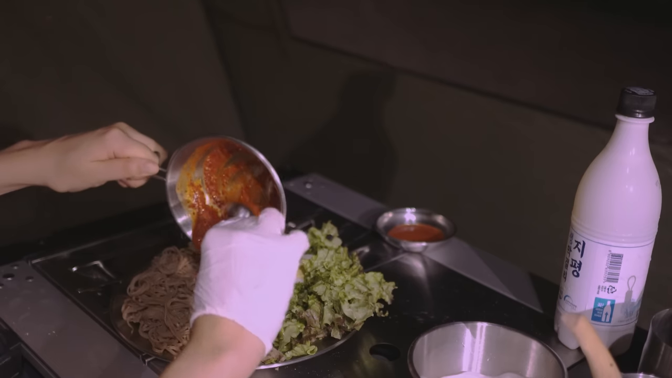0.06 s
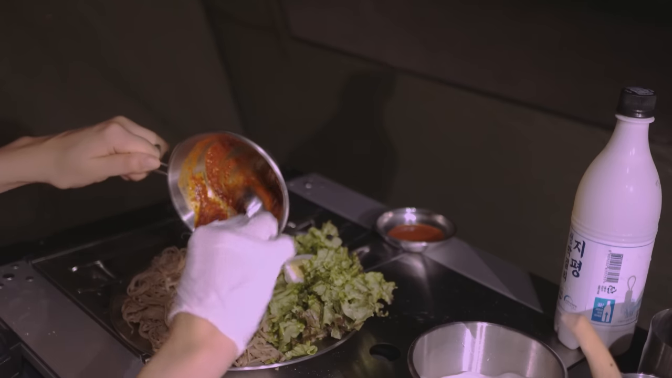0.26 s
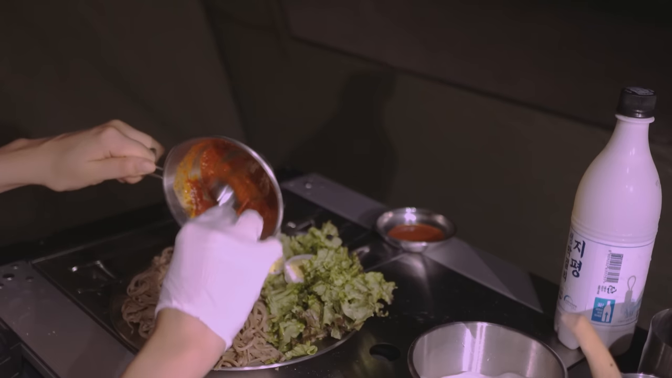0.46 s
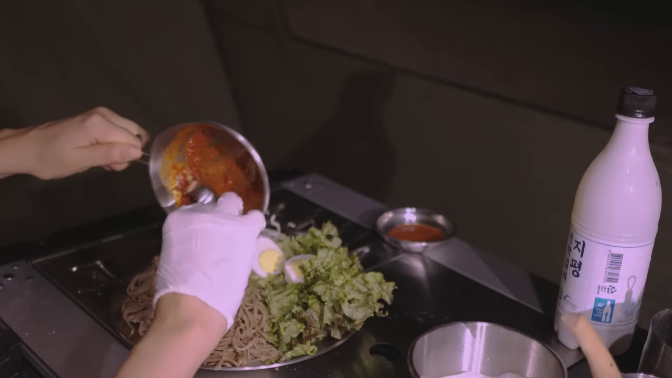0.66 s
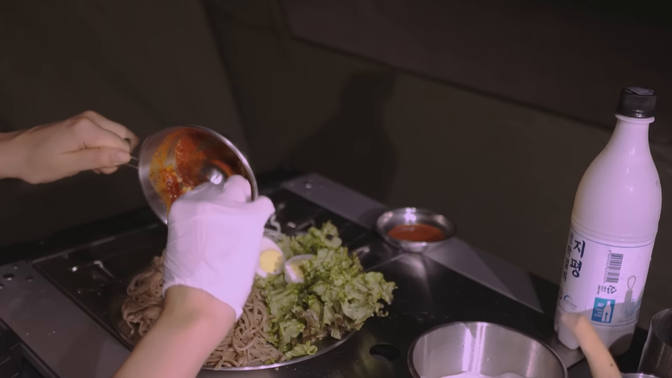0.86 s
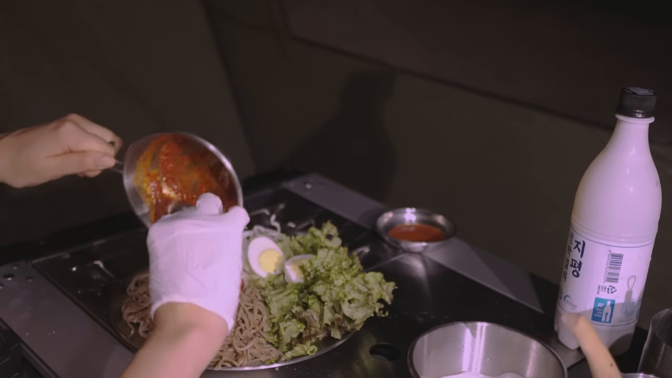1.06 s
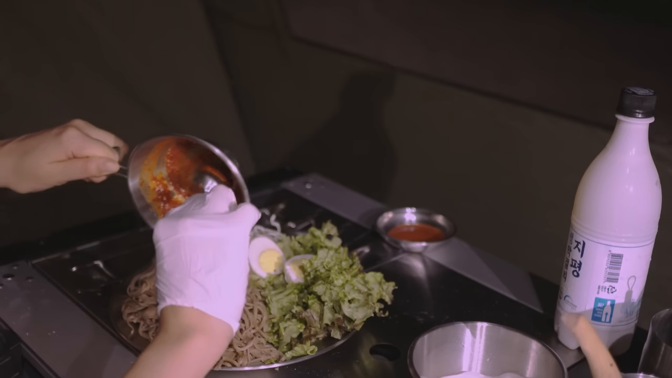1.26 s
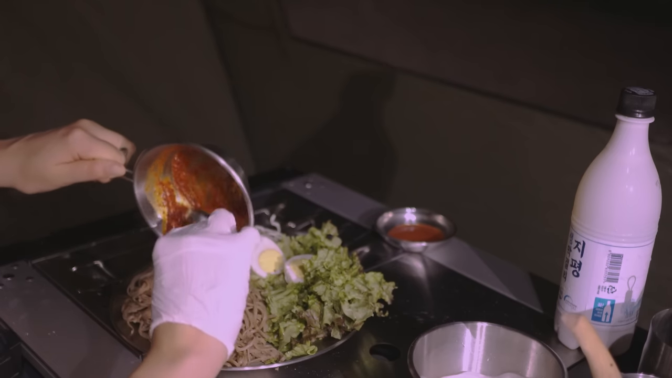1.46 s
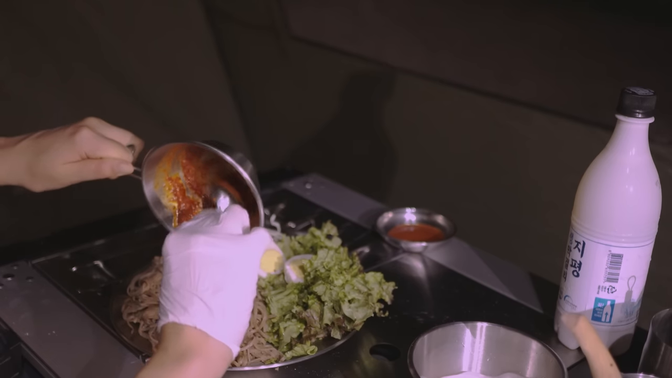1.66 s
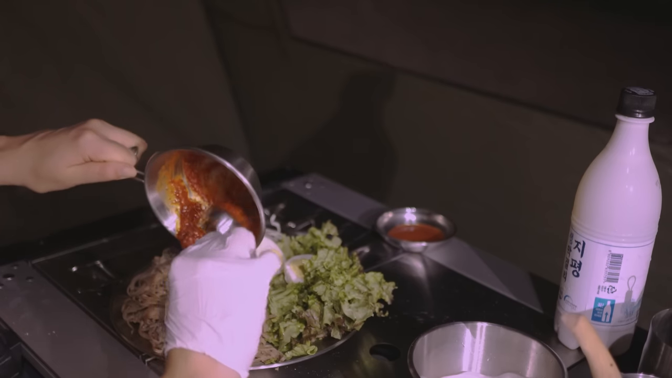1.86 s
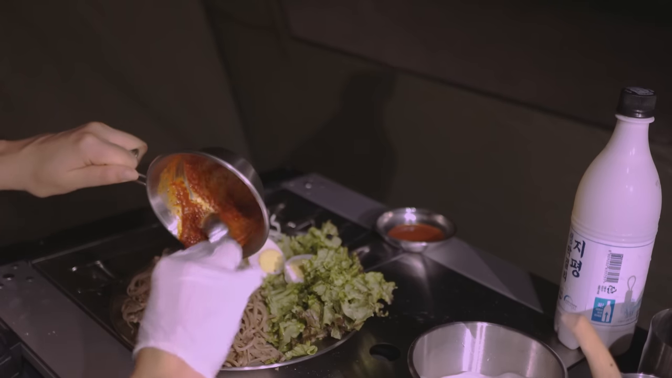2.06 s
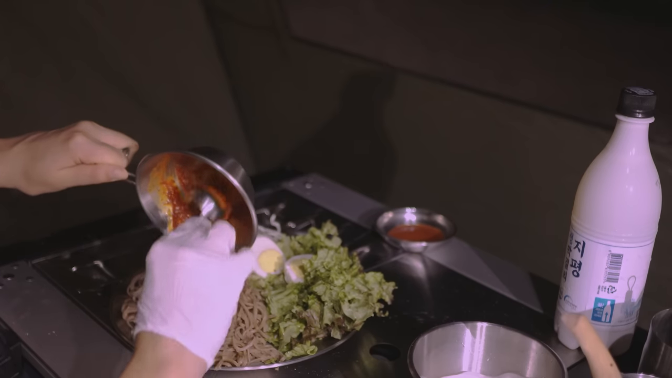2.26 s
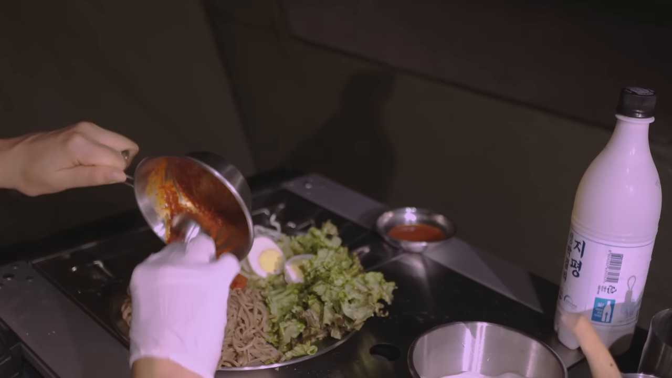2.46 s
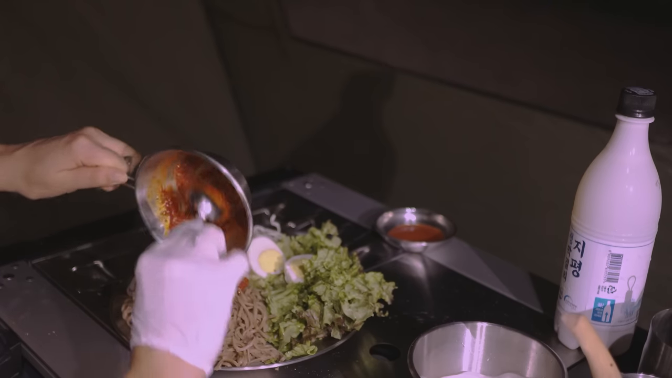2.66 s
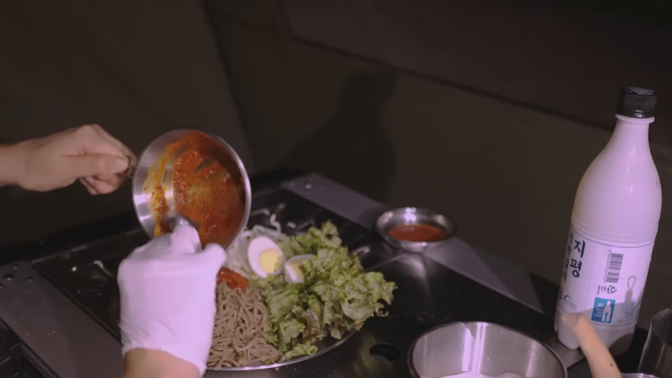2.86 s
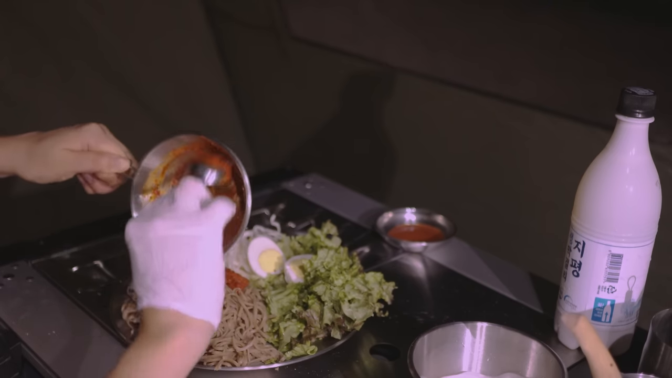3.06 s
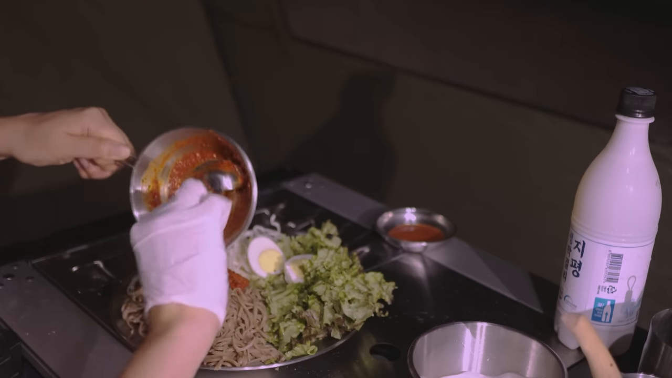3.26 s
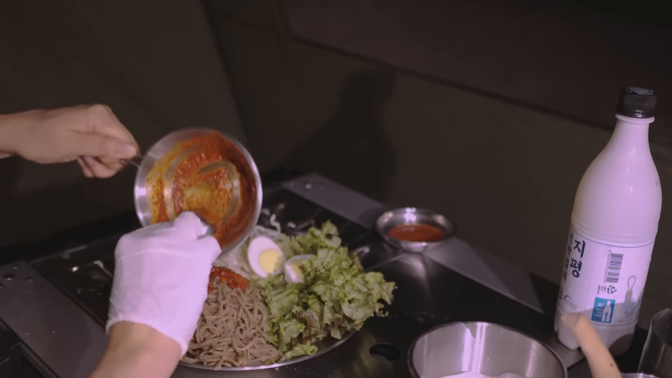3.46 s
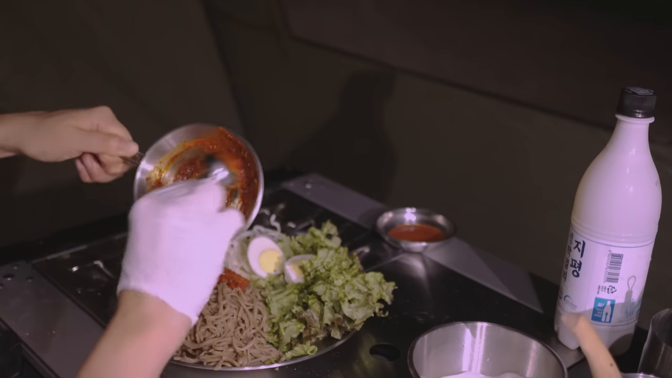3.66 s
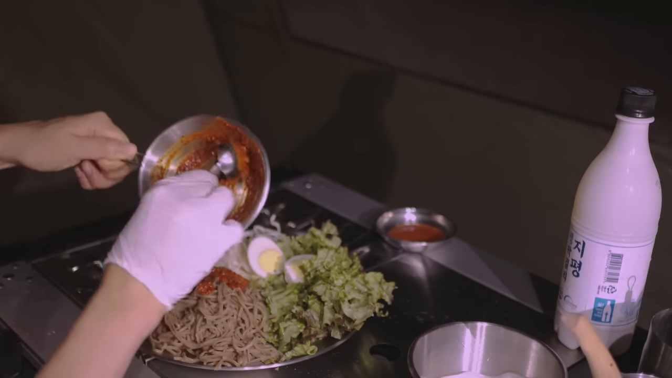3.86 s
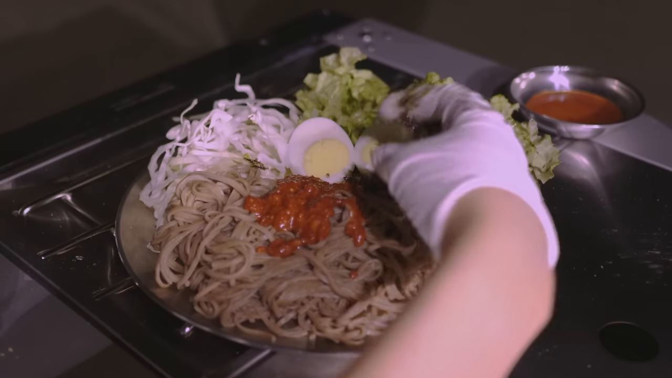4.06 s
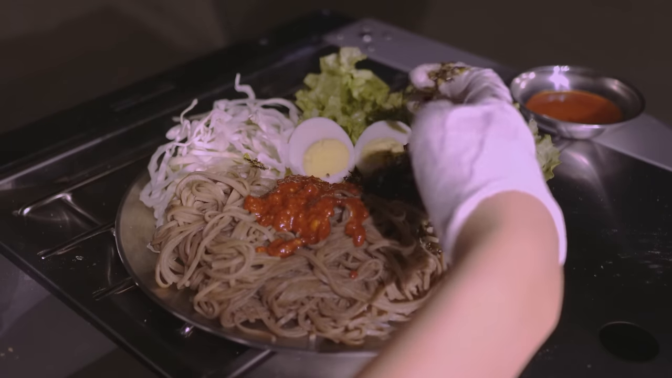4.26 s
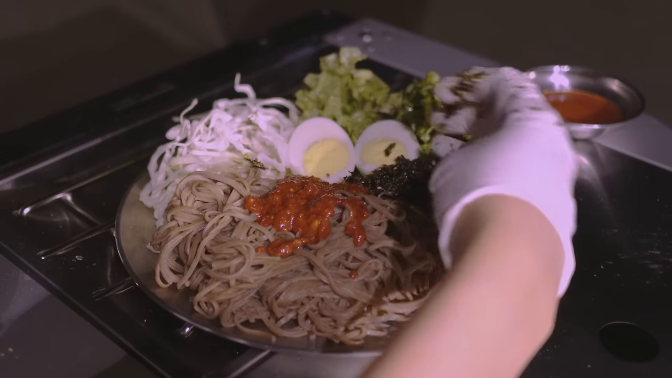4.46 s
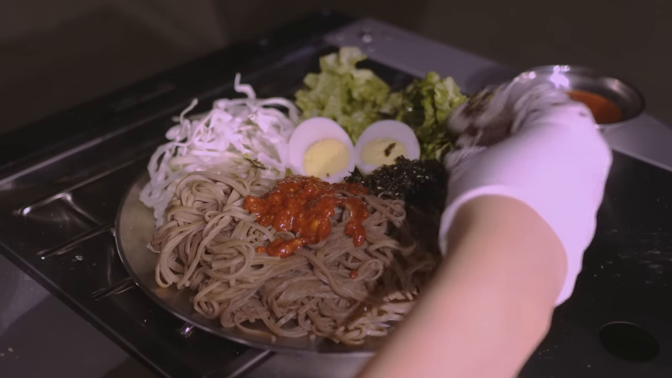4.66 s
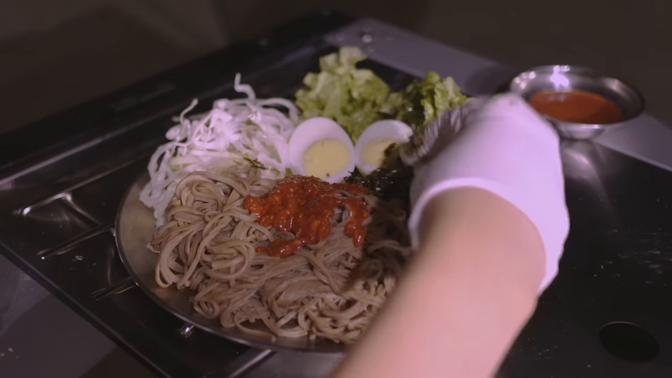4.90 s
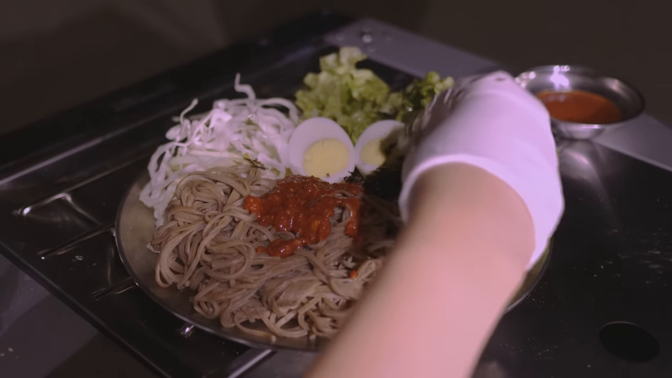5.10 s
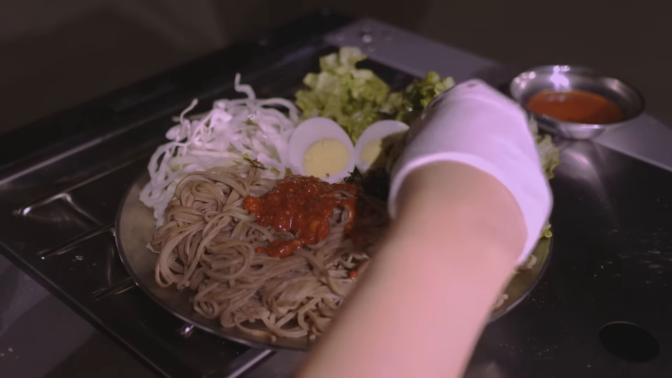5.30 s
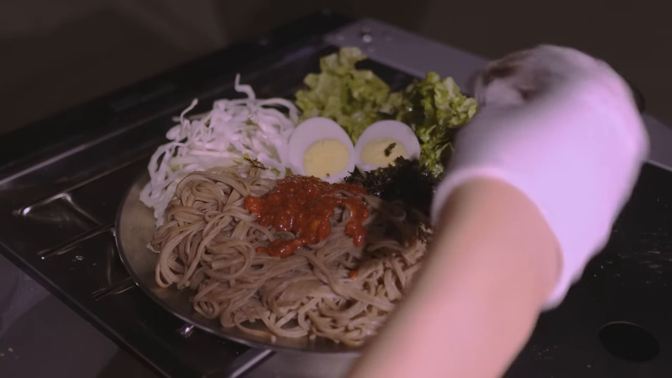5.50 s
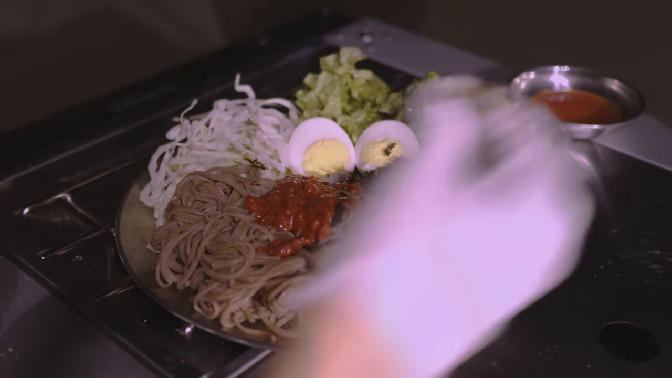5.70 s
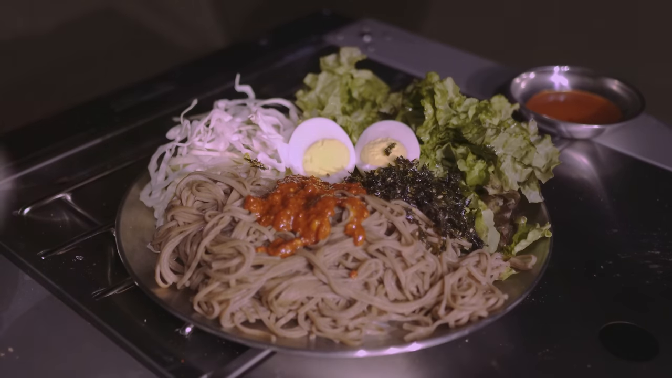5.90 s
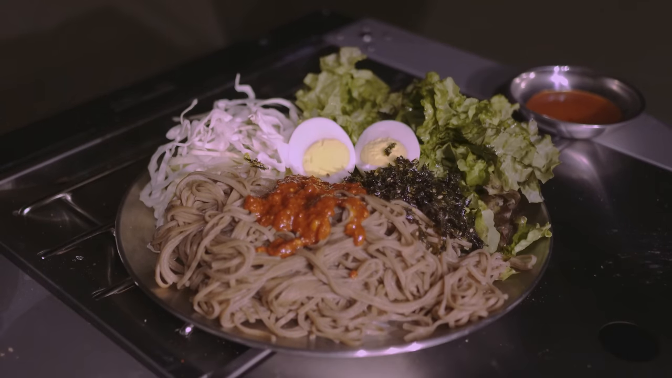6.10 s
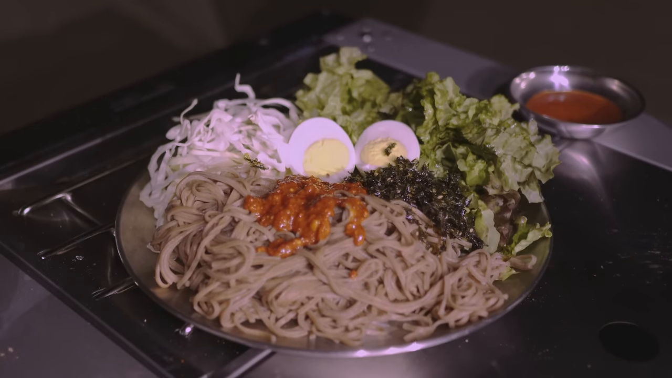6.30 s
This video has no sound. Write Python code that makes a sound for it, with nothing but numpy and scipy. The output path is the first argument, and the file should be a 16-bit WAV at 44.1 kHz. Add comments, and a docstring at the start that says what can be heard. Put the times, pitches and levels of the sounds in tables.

```python
"""A spoon knocks, scrapes and squeaks in a small steel bowl, close by, outdoors at night.
Its blows and rough slips set off the ringing of the steel; all sound of the bowl is cut off abruptly at 3.954 s.
Then dry seaweed is crumbled, heard as faint random snaps, and something slides and knocks on the tray.
All around, several kinds of cricket trill in sagging pulses, and a nearer one chirps in falling whistles.
Coloured noise adds the night air: a low rumble and a soft wash."""
import sys
import numpy as np
from scipy import signal
from scipy.fft import rfft, irfft
from scipy.io import wavfile
from scipy.ndimage import uniform_filter1d

SR = 44100
rng = np.random.default_rng(int(sys.argv[2]) if len(sys.argv) > 2 else 0)


def wav_out(sig):
    """Save sig, one row per channel (or a flat mono array), as 16-bit PCM at SR to the path in sys.argv[1]."""
    wavfile.write(sys.argv[1], SR, np.round(np.clip(np.atleast_2d(sig).T, -1, 1) * 32767).astype(np.int16))


N = 279594
TIME = np.arange(N) / SR


def amp(db):
    """Turns decibels into a gain."""
    return 10 ** (np.asarray(db) / 20)


def unit(x):
    """Scales a sound to an average (rms) level of 1."""
    return x / np.sqrt(np.mean(x ** 2) + 1e-20)


def read(points, hz):
    """Reads a curve between its points, along a log-frequency axis."""
    point_hz, value = np.transpose(points)
    return np.interp(np.log(hz + 1), np.log(point_hz), value)


def add(mix, s, sound):
    """Mixes a sound in at time s."""
    part = mix[max(round(s * SR), 0):][:len(sound)]
    part += sound[:len(part)]


def ring(x, response):
    """Lets a sound set off a response, as a struck or rubbed body rings."""
    return signal.fftconvolve(x, response)[:N]


def colour(points, size=2048):
    """Makes a response of energy 1 with the given spectrum, which never sounds ahead of its cause."""
    log_gain = np.log(amp(read(points, abs(np.fft.fftfreq(size, 1 / SR)))))
    spectrum = np.exp(np.conj(signal.hilbert(log_gain)))
    response = np.fft.ifft(spectrum).real[:size // 2]
    return response / np.linalg.norm(response)


def drift(per_s):
    """Random wavering of rms 1; a higher rate wavers faster."""
    knots = rng.standard_normal(4096)
    return unit(np.interp(TIME * 2 * per_s, np.arange(len(knots)), knots))


def tail(t60, size=16384):
    """Dense dying noise of energy 1 that falls by 60 dB in t60 seconds."""
    response = rng.standard_normal(size) * amp(-60 * np.arange(size) / SR / t60)
    return response / np.linalg.norm(response)


def grains(per_s, spread_db):
    """Tiny slips or snaps of uneven size at random moments, rms 1."""
    size = amp(spread_db * np.minimum(rng.exponential(1, N), 2))
    happens = rng.random(N) < per_s / SR
    return unit(size * rng.choice([-1, 1], N) * happens)


def contact(seconds, chatter, size=400):
    """One sharp contact with a brief dying chatter after it, energy 1."""
    burst = rng.choice([-1., 1.], size) * np.exp(-np.arange(size) / SR / seconds)
    burst *= chatter / np.linalg.norm(burst)
    burst[0] = 1
    return burst / np.linalg.norm(burst)


def bouts(rows, rise_s, fall_s):
    """Gain over time: each row (start_s, end_s, level_db) fades in, holds and fades out."""
    gain = 0
    for start, end, db in rows:
        fade = np.minimum((TIME - start) / rise_s, (end - TIME) / fall_s)
        gain = gain + amp(db) * np.clip(fade, 0, 1)
    return gain


def push(start, fastest, end, db, swell_db=12.5, release_db=11.5):
    """Gain along one stroke of the hand, which speeds up and then slows."""
    t = start + np.arange(max(round((end - start) * SR), 2)) / SR
    return amp(db + np.interp(t, [start, fastest, end], [-swell_db, 0, -release_db]))


# spectrum of the night air: pitch_hz, level_db
AIR_COLOUR = [(20, 5.5), (45, -4), (80, -10.5), (200, -13), (500, -13), (1000, -14.5), (2000, -16),
              (3200, -13.5), (5000, -18), (6000, -24), (9000, -26.5), (15000, -23)]
# how alike the air is at left and right: pitch_hz, likeness (1 = the same)
AIR_LIKENESS = [(30, 0.31), (80, 0.75), (300, 0.29), (1100, 0.65), (2000, 0.57), (16000, .2)]


def night_air(level_db=-50.5):
    """Coloured noise gives a low rumble and a soft wash of far insects, partly alike on both sides."""
    hz = np.fft.rfftfreq(N, 1 / SR)
    left, other = rfft(rng.standard_normal((2, N))) * amp(read(AIR_COLOUR, hz))
    same = np.clip(read(AIR_LIKENESS, hz), -1, 1)
    right = same * left + np.sqrt(1 - same ** 2) * other
    return amp(level_db) * unit(irfft(np.array([left, right]), N))


def outdoors(x, scattered, balance_db, t60, late_ms):
    """A call reaches the left later; ground and foliage scatter it differently to each side."""
    share = np.clip(scattered, 0, 1)
    direct = np.array([np.roll(x, round(late_ms * SR / 1000)), x])
    echoes = np.array([ring(x, tail(t60)) for side in range(2)])
    both = np.sqrt(1 - share) * unit(direct) + np.sqrt(share) * unit(echoes)
    return unit(both) * amp([[balance_db / 2], [-balance_db / 2]])


def trill(hz, per_s, fall_hz):
    """Each wing stroke sounds one pulse that sags in pitch as the wing slows."""
    rate = per_s * (1 + .015 * drift(per_s=3))
    cycle = (np.cumsum(rate) / SR + rng.random()) % 1  # place within the pulse, 0 to 1
    pitch = hz + fall_hz * (.5 - cycle) + 40 * drift(per_s=50)
    tone = np.sin(2 * np.pi * np.cumsum(pitch) / SR)
    return np.sin(np.pi * cycle) ** 2 * tone * amp(2.0 * drift(per_s=12))


# kinds of trilling cricket: pitch_hz, spread_hz of the distant ones, pulses_per_s, fall_hz in each pulse,
# nearest_db, distant_db, balance_db (left over right), late_ms (later on the left);
# for the main kind and those in bouts, the two levels add to the level of the trill or bout
CRICKETS = {"low": (2150, 55, 55.5, 110, -59, -55.5, -3.5, 0.14),
            "faint": (2968, 91.5, 40.5, 112, -65.5, -59.5, 1, 0.4),
            "far": (3690, 70, 45.5, 140, -57, -53, -0.5, 0.04),
            "main": (3870, 60, 27, 300, -5.5, -4.5, -3.5, .023),
            "middle": (4080, 60, 28, 304, -4, -6, -4, 0), "sweep": (4300, 198, 31, 550, -4, -3, 2.5, 0.2),
            "high": (5028, 71, 48, 300, -7, -5.5, -7, .14)}
# kinds that trill in bouts, the high one about once a second: start_s, end_s, level_db
CRICKET_BOUTS = {"high": [(-.15, .52, -51.5), (.7, 1.42, -53.5), (1.88, 2.5, -52), (2.98, 3.58, -50),
                 (3.95, 4.7, -54.5), (4.95, 5.75, -53.5), (5.92, 6.5, -50)], "sweep": [(2.52, 3.0, -57),
                 (2.95, 3.38, -48), (5.5, 6.1, -58)], "middle": [(.1, .65, -54), (2.05, 2.42, -51),
                 (4.45, 4.74, -47.5), (4.86, 5.14, -56), (5.5, 6.1, -55)]}
# the one lull of the main trill: start_s, end_s, dip_db
LULL = (2.2, 3.45, -4.5)


def chorus(main_db=-48, resting_db=-64):
    """Of each kind, the nearest pulses clearly; two distant ones, higher and lower, blur into a shimmer."""
    swell = {}
    for kind, rows in CRICKET_BOUTS.items():
        # a faint trill goes on between bouts
        swell[kind] = amp(resting_db) + bouts(rows, rise_s=.14, fall_s=.15)
    start, end, dip_db = LULL
    swell["main"] = amp(main_db + dip_db * bouts([(start, end, 0)], rise_s=.25, fall_s=0.46))
    out = np.zeros((2, N))
    for kind, row in CRICKETS.items():
        hz, spread_hz, per_s, fall_hz, nearest_db, distant_db, balance_db, late_ms = row
        higher = trill(hz + spread_hz, per_s * 1.13, fall_hz)
        lower = trill(hz - spread_hz, per_s * .88, fall_hz)
        nearest = outdoors(trill(hz, per_s, fall_hz), .3, balance_db, t60=.045, late_ms=late_ms)
        distant = outdoors(higher + lower, .9, balance_db, t60=.2, late_ms=late_ms)
        out += swell.get(kind, 1) * (amp(nearest_db) * nearest + amp(distant_db) * distant)
    return out


# phrases of two pairs of wing strokes: first_pair_s, level_db, leads_in (whether a single stroke comes first)
CHIRPS = [(.172, -40.5, True), (1.564, -42, True), (1.97, -54, False), (3.775, -54, True),
          (3.956, -44.5, False), (4.65, -58, False), (5.463, -45.5, True), (5.875, -45.5, False)]


def near_cricket(top_hz=5420, end_hz=4280, seconds=0.0251):
    """Single wing strokes, mostly in pairs, each a steeply falling whistle."""
    pair_s, rest_s = .045, .074  # between strokes within a pair, and on to the next pair
    pairs = [0, pair_s, pair_s + rest_s, 2 * pair_s + rest_s]
    song = np.zeros(N)
    u = np.linspace(0, 1, round(seconds * SR))
    fade = signal.windows.tukey(len(u), .7)
    for s, db, leads_in in CHIRPS:
        lead = [-rest_s] if leads_in else []
        for offset in lead + pairs:
            pitch = (top_hz + (end_hz - top_hz) * u) * (1 + 0.0066 * rng.standard_normal())
            whistle = np.sin(2 * np.pi * np.cumsum(pitch) / SR)
            add(song, s + offset, amp(db) * np.sqrt(2) * fade * whistle)
    return np.std(song) * outdoors(song, scattered=0.26, balance_db=-5.0, t60=0.14, late_ms=.16)


# slide over the tray: start_s, fastest_s, end_s, top_level_db
TRAY_SLIDE = (6.222, 6.29, 6.37, -35.5)
# knocks on the tray: start_s, level_db
KNOCKS = [(6.284, -8), (6.3198, -5.5)]
# spectrum of the tray: pitch_hz, level_db
TRAY_COLOUR = [(40, -6), (110, 2.5), (220, -5), (400, 0.5), (620, -3), (850, 3.5), (1100, 2), (2200, 0.5),
               (4000, -7.5), (6000, -6), (8000, -11), (10000, -4.5), (12000, -17), (16000, -16)]


def tray():
    """A short rough slide and two knocks set off the tray."""
    drive = np.zeros(N)
    add(drive, TRAY_SLIDE[0], push(*TRAY_SLIDE))
    drive *= grains(per_s=5000, spread_db=3.5)
    for s, db in KNOCKS:
        add(drive, s, amp(db) * contact(seconds=0.002, chatter=2))
    return ring(drive, colour(TRAY_COLOUR))


# pinches of crumbling seaweed: start_s, end_s, level_db
CRUMBLES = [(3.98, 4.42, -62), (4.38, 5.13, -56.5), (5.29, 5.39, -51.5), (5.55, 5.68, -63)]
# spectrum of the snapping flakes: pitch_hz, level_db
FLAKE_COLOUR = [(500, -45), (2500, 2), (5000, -1), (7500, -4.5), (11000, 2), (16000, -7)]


def seaweed():
    """Dry flakes snap faintly between gloved fingers."""
    snaps = ring(grains(per_s=2500, spread_db=4.0), colour(FLAKE_COLOUR))
    return bouts(CRUMBLES, rise_s=.04, fall_s=.07) * snaps


# ringing tones of the bowl, damped by sauce and fingers: pitch_hz, level_db, t60_s (time to fall 60 dB), family
BOWL_MODES = [(1203, -1.5, 0.098, "fundamental"), (1173, -14, 0.17, "fundamental"),
              (1157, -11, 0.08, "fundamental"), (1153, -59.5, 0.045, "fundamental"),
              (1082, -16.5, 0.06, "fundamental"), (2670, -8.5, 0.1, "wall"), (2424, -11, 0.026, "wall"),
              (2580, -18, 0.017, "wall"), (2520, -11, 0.019, "wall"), (2980, -27.5, 0.038, "wall"),
              (3920, -44, .04, "wall"), (1830, -22, 0.18, "rim"), (1840, -39, 0.17, "rim"),
              (3130, -14.5, 0.12, "rim"), (4280, -5, 0.063, "rim"), (4580, -8, .045, "rim"),
              (4770, -22.5, 0.21, "rim"), (6158, -0.5, .22, "high"), (6470, -7, 0.26, "high"),
              (6640, -32, .22, "high"), (6675, -6, 0.17, "high"), (6870, -18, 0.18, "high"),
              (7000, -35, 0.57, "high"), (7450, -11, 0.29, "high"), (9763, 6.5, 0.28, "high"),
              (11100, 4, 0.21, "high")]


def modes(family, detune=0, size=12000):
    """Free ringing of one family of bowl tones; the spoon's touch can pull each a little off pitch."""
    t = np.arange(size) / SR
    total = np.zeros(size)
    for hz, db, t60, name in BOWL_MODES:
        if name == family:
            pulled_hz = hz + detune / t60 * rng.standard_normal()  # short rings are pulled further
            total += amp(db - 60 * t / t60) * np.cos(2 * np.pi * pulled_hz * t)
    return total


def shimmer(x, t60):
    """Countless close tones store the energy of x and let it die; which ones sound shifts as the spoon moves."""
    keep = amp(-120 / t60 / SR)
    stored = signal.lfilter([1 - keep], [1, -keep], x ** 2)
    spectra = signal.stft(rng.standard_normal(N), nperseg=512)[2]
    # smooth patches over pitch, then over time
    patches = uniform_filter1d(rng.standard_normal(spectra.shape), size=4, axis=0)
    patches = unit(uniform_filter1d(patches, size=14, axis=1))
    cloud = unit(signal.istft(spectra * amp(4 * patches), nperseg=512)[1][:N])
    return np.sqrt(stored) * cloud


# squeaks, where the slips lock into a rough tone: start_s, end_s, pitch_hz, level_db
SQUEAK_TIMES = [(1.129, 1.136, 7000, -34), (1.79, 1.847, 6500, -33.5), (2.11, 2.143, 6650, -40),
                (2.483, 2.504, 6600, -33), (2.516, 2.553, 6620, -22), (3.342, 3.39, 4650, -30.5)]


def squeaks(wander_hz=260):
    """Steel chatters on steel at an unsteady pitch."""
    out = np.zeros(N)
    wander = wander_hz * drift(per_s=770)
    flutter = amp(1.9 * drift(per_s=340))
    for start, end, hz, db in SQUEAK_TIMES:
        first = round(start * SR)
        span = np.arange(first, max(round(end * SR), first + 2))
        tone = np.sin(2 * np.pi * np.cumsum(hz + wander[span]) / SR)
        add(out, start, amp(db) * tone * flutter[span] * signal.windows.tukey(len(span), .5))
    return out


# scraping strokes: start_s, fastest_s, end_s, top_level_db, pressure_db on the low tones,
# place (0 = wall, 1 = rim)
SCRAPE_STROKES = [(0.028, 0.043, .09, -43, 4, 0), (.333, 0.359, 0.39, -38.5, -2, .3),
                  (0.691, 0.744, 0.76, -29, 5, 0), (1.045, 1.082, 1.115, -37.5, 12, .25),
                  (1.112, 1.129, 1.165, -27.5, -20, .2), (1.416, 1.42, 1.48, -35, -1.5, .1),
                  (1.476, 1.508, 1.542, -40.5, 4, 0.38), (1.762, 1.829, 1.85, -29.5, -3, 0.14),
                  (2.079, 2.134, 2.19, -34, -20, .45), (2.471, 2.53, 2.576, -28.5, -0.5, .15),
                  (2.835, 2.868, 2.91, -42, 5, 0.17), (2.947, 2.953, 3.01, -40, 2, .1),
                  (3.31, 3.334, 3.36, -44.5, 16, 0.67), (3.342, 3.353, 3.375, -30, 8, 1),
                  (3.367, 3.377, 3.424, -26.5, -2, 1), (3.453, 3.475, 3.52, -30.5, 2, 0.88),
                  (3.765, 3.762, 3.85, -45.5, -11, .33), (3.905, 3.925, 3.97, -36.5, 4.5, 0.95)]
# spectra of the gritty contact and of the rasping wall and rim: pitch_hz, level_db
GRIT_COLOUR = [(200, -32), (400, -15.5), (700, -4.5), (1500, -9), (2600, -4.5), (4200, -9.5), (6400, 4),
               (8000, 2.5), (12000, 2), (16000, -1.5)]
WALL_COLOUR = [(300, -26), (600, -8.5), (1000, -1), (1200, 7.5), (1500, -14.5), (2100, 0), (2600, 0.5),
               (3300, -4), (4200, -12), (8000, -35)]
RIM_COLOUR = [(300, -35), (600, -28), (820, -1), (1400, -19), (2000, 6), (2400, -26), (3100, 5.5),
              (3700, -6), (4500, -7), (5600, 6.5), (7500, -9), (11000, -27)]


def scrapes(ease_db=4):
    """The spoon sticks and slips in clumps of grains; pressing harder wakes the low tones: (grit, body)."""
    grit, wall, rim, wall_rasp, rim_rasp = np.zeros((5, N))
    slips = unit(grains(per_s=3500, spread_db=3.5) * amp(3.4 * drift(per_s=180)))
    for start, fastest, end, db, press_db, place in SCRAPE_STROKES:
        stroke = push(start, fastest, end, db)
        stroke = stroke * unit(slips[round(start * SR):][:len(stroke)])
        # the hand eases its pressure along the stroke
        pressed = stroke * amp(press_db + ease_db * np.linspace(.5, -.5, len(stroke)))
        add(grit, start, stroke)
        add(wall, start, pressed * (1 - place))
        add(rim, start, pressed * place)
        # every stroke touches a new spot, which rings with its own scatter of short tones
        rasp = signal.fftconvolve(pressed, tail(t60=.045))
        add(wall_rasp, start, rasp * (1 - place))
        add(rim_rasp, start, rasp * place)
    body = amp(-27.5) * ring(wall + .5 * rim, modes("fundamental"))
    body += amp(-4) * ring(wall_rasp, colour(WALL_COLOUR)) + amp(-27) * ring(wall, modes("wall"))
    body += amp(-5) * ring(rim_rasp, colour(RIM_COLOUR)) + amp(-23) * ring(rim, modes("rim"))
    return ring(grit, colour(GRIT_COLOUR)), body


# spoon blows: start_s, strength_db, free_db (how freely the fundamental rings), touch
SPOON_BLOWS = [(.012, -10.5, -1, "base"), (.430, -14.5, -3.5, "edge"), (.676, 0, 0, "wall"),
               (.726, -4.5, -10, "skid"), (.747, 0.5, 4, "skid"), (.939, -32, -6, "soft"),
               (1.037, -2, 0, "wall"), (1.071, -30.5, 1, "soft"), (1.101, -9.5, 1, "skid"),
               (1.1331, 3, -4, "edge"), (1.146, -8, -3, "edge"), (1.309, -30.5, -2, "soft"),
               (1.414, -1, 0, "base"), (1.7581, -1.5, -7.5, "base"), (1.801, -10.5, -2, "skid"),
               (1.8349, -27, 2, "soft"), (2.154, -14, -1, "sauce"), (2.211, -6, -3.5, "edge"),
               (2.454, 0, 0, "base"), (2.473, -23, -3, "soft"), (2.53, 4, 5, "edge"),
               (2.548, -4, 5.5, "edge"), (2.8339, 0.5, 9, "sauce"), (2.899, -14.5, 1, "edge"),
               (2.9505, -29, -5, "soft"), (2.973, -9.5, -7, "edge"), (3.1573, -20, -11, "edge"),
               (3.2597, -17.5, 0.5, "soft"), (3.3223, -28.5, -5, "soft"), (3.3485, -8.5, -9, "rim"),
               (3.375, -10, -5, "rim"), (3.403, -26, -2, "soft"), (3.7649, -17, -4, "edge"),
               (3.833, -24, -10, "edge"), (3.8999, 4, 1.5, "rim")]
# what each kind of touch wakes, relative to the blow's strength:
# fundamental_db, wall_db, rim_db, thud_db
TOUCH_LEVELS = {"wall": (-9, -8, -25, -3.5), "base": (-16, -22, -34, -4), "sauce": (-26, -40, -43, -3.5),
                "rim": (-19.5, -30, -16, -11.5), "soft": (3, -18, -14, 7.5), "edge": (-27, -28, -42, -21),
                "skid": (-26, -12, -36, -23)}
# spectra of the sharp tick and the dull thud: pitch_hz, level_db
TICK_COLOUR = [(200, -55), (600, -14), (1500, 5), (2600, 4.5), (4200, 4), (6400, 6.5), (8000, -0.5),
               (12000, 3), (16000, 4.5)]
THUD_COLOUR = [(60, -33), (200, -0.5), (380, -0.5), (650, 5.5), (1000, 8.5), (1450, -21), (3000, -10),
               (8000, -47)]


def blows():
    """Each blow gives a tick, a dull thud and ringing tones: (ticks, body)."""
    ticks, ringing, thuds = np.zeros((3, N))
    # the spoon settles on the steel a moment after it lands and damps the ring
    settle = amp(np.interp(np.arange(12000) / SR, [.011, .022], [0, -5]))
    for s, strength_db, free_db, touch in SPOON_BLOWS:
        fundamental_db, wall_db, rim_db, thud_db = strength_db + np.array(TOUCH_LEVELS[touch])
        add(ticks, s, amp(strength_db) * contact(seconds=.0014, chatter=5))
        add(thuds, s, amp([thud_db]))
        families = ("fundamental", fundamental_db + free_db), ("wall", wall_db), ("rim", rim_db)
        for family, db in families:
            add(ringing, s, amp(db) * settle * modes(family, detune=1.0))
    # the tray below throws the ring back, so it holds for a moment before it falls
    ringing += amp(-7) * np.roll(ringing, round(.005 * SR))
    body = amp(-2.0) * ringing + ring(thuds, colour(THUD_COLOUR))
    return ring(ticks, colour(TICK_COLOUR)), body


# spectrum of the steel's shimmer: pitch_hz, level_db
SHIMMER_COLOUR = [(300, -32), (600, -10), (900, -13), (1600, -5), (2600, 0.5), (4500, -3.5), (6500, 2.5),
                  (9000, 4), (16000, -1)]


def spoon_and_bowl(lowest_hz=320, cut_s=3.954):
    """Blows, scrapes and squeaks excite the steel's high tones; so small a bowl radiates no bass."""
    ticks, blow_body = blows()
    grit, scrape_body = scrapes()
    bright = ticks + grit + squeaks()
    sound = bright + blow_body + scrape_body
    sound += amp(-3.5) * ring(shimmer(bright, t60=0.22), colour(SHIMMER_COLOUR))
    sound += amp(-53) * ring(bright, modes("high"))
    no_bass = signal.butter(4, lowest_hz, "high", fs=SR, output="sos")
    sound = signal.sosfilt(no_bass, sound)
    return sound * np.clip((cut_s - TIME) / 0.00062, 0, 1)  # all sound of the bowl is cut off abruptly


def scene():
    """The food is handled dead centre; the insects are spread wide."""
    background = night_air() + chorus() + near_cricket()
    return background + tray() + seaweed() + spoon_and_bowl()


def record(dry, edge_hz=16050):
    """Takes away the highest treble, above the band limit."""
    low_pass = signal.firwin(301, edge_hz, window=("kaiser", 9), fs=SR)
    return signal.oaconvolve(dry, low_pass[None], "same")


dry = scene()
out = record(dry)
wav_out(out)
```